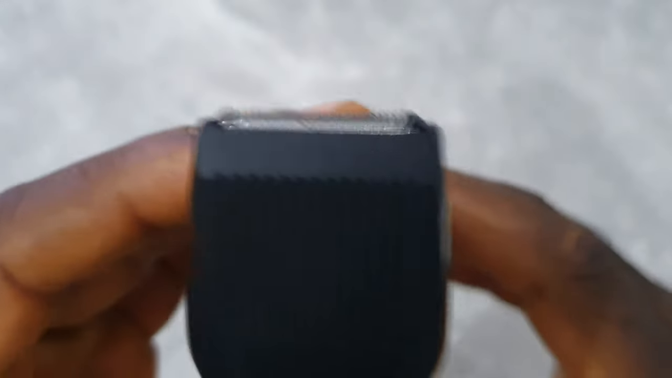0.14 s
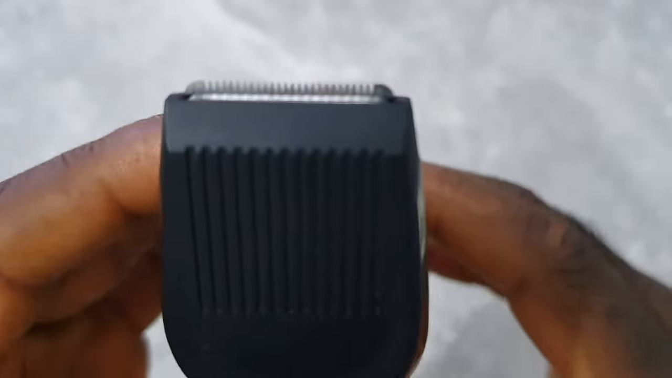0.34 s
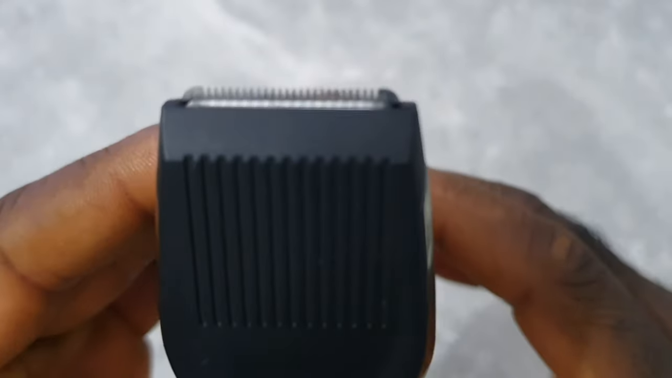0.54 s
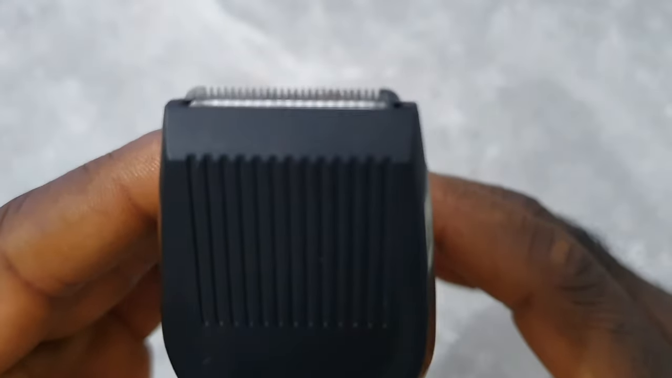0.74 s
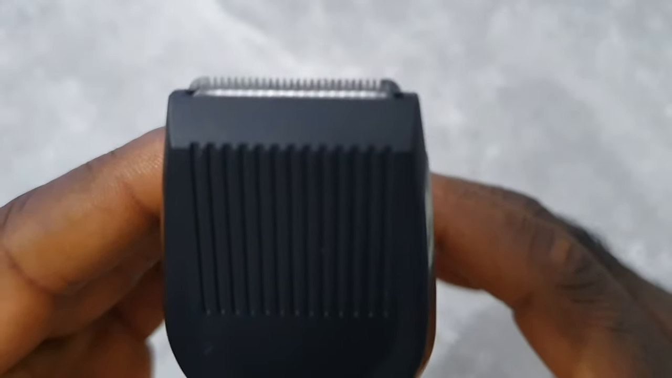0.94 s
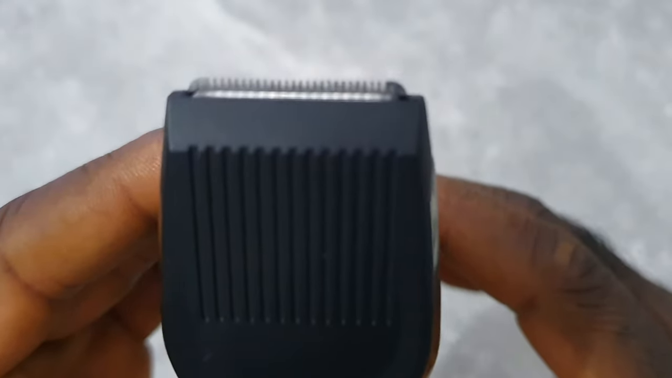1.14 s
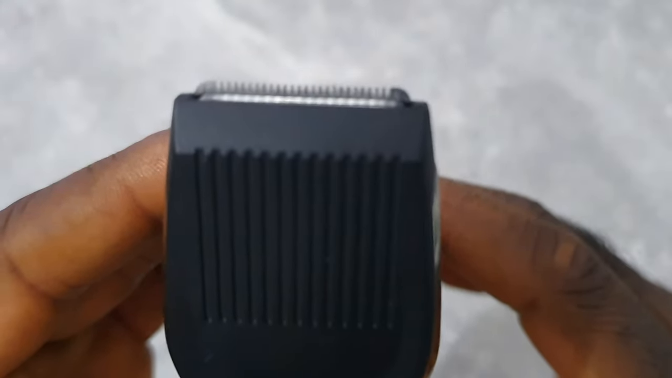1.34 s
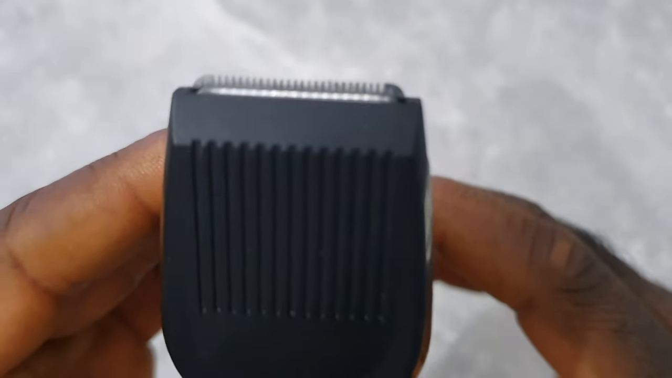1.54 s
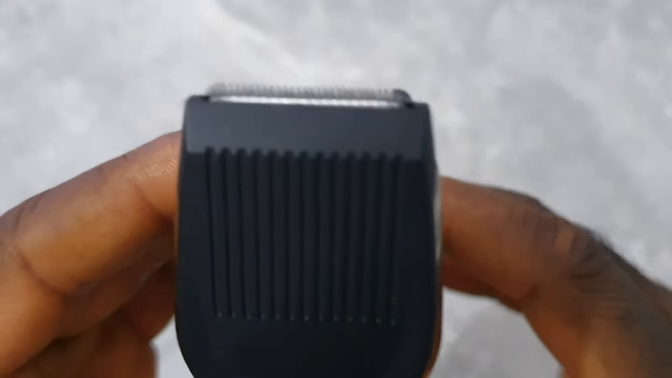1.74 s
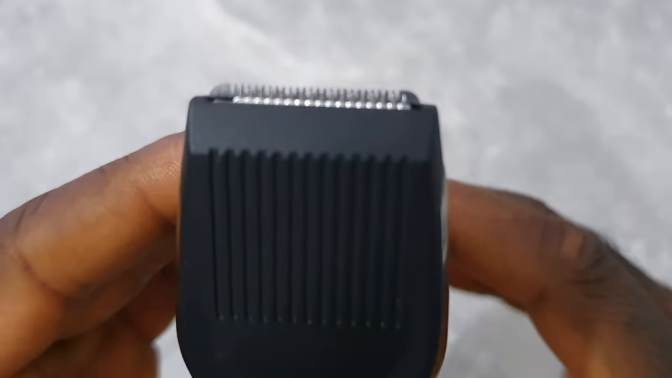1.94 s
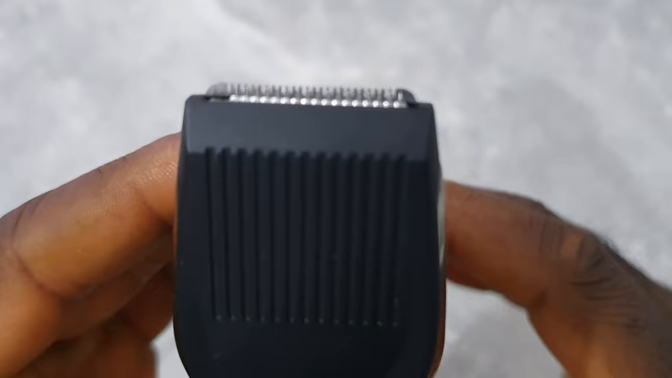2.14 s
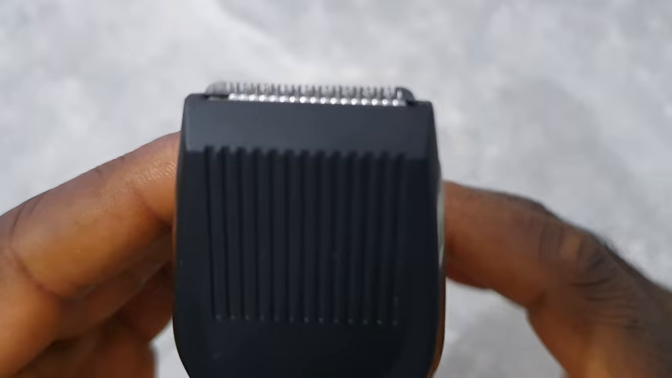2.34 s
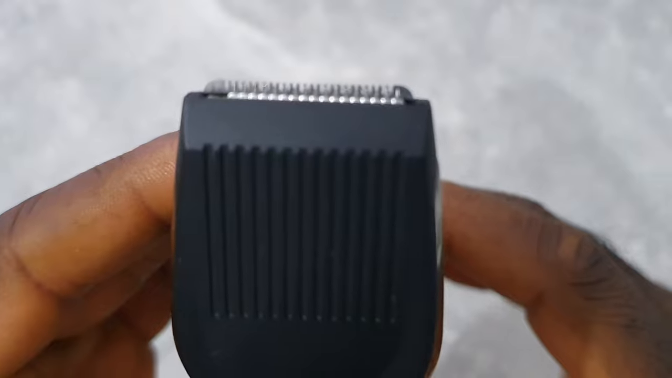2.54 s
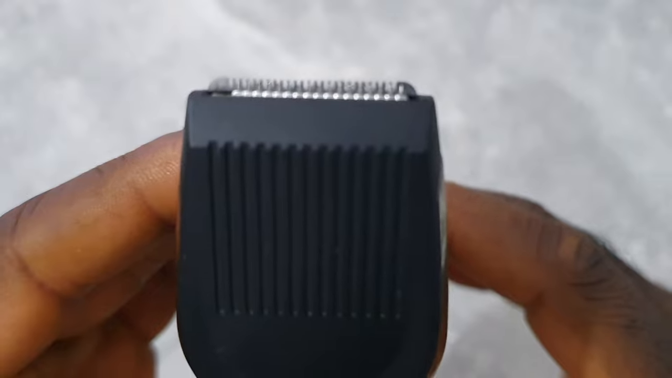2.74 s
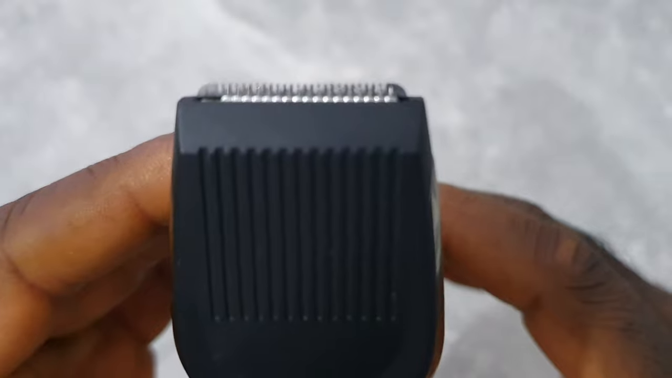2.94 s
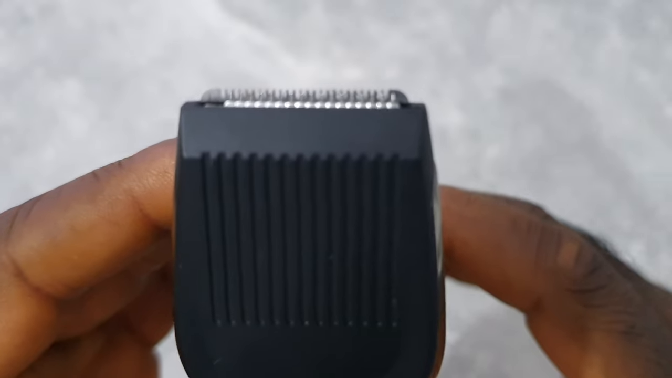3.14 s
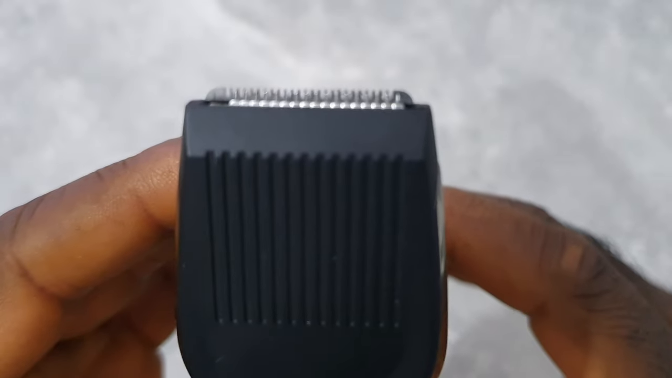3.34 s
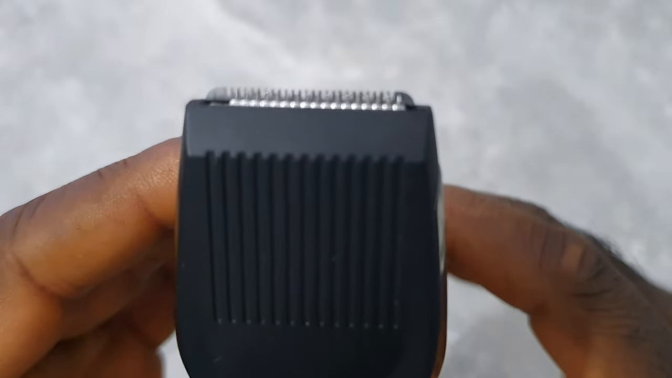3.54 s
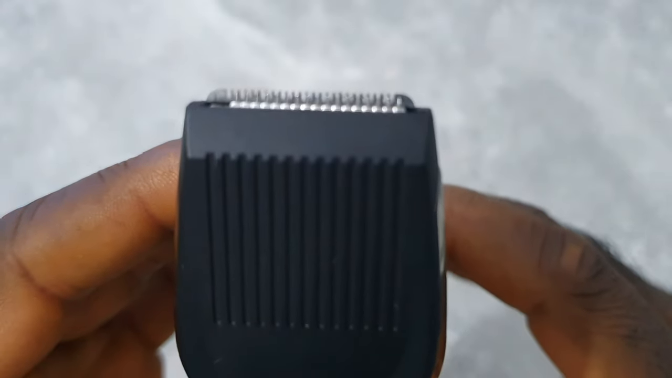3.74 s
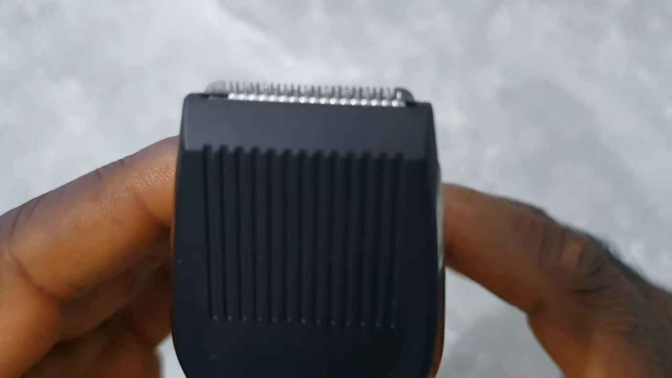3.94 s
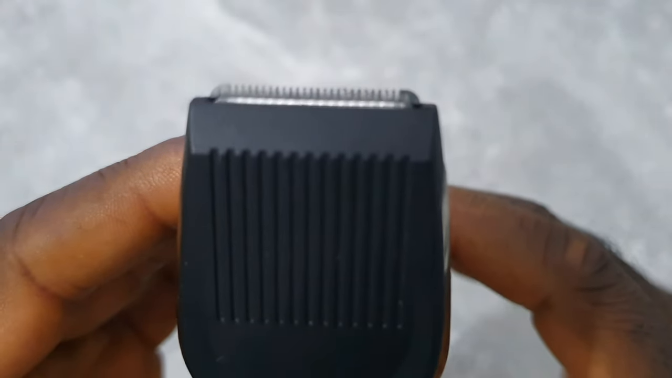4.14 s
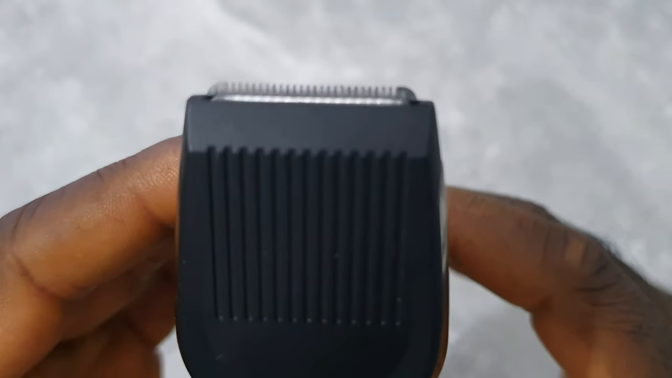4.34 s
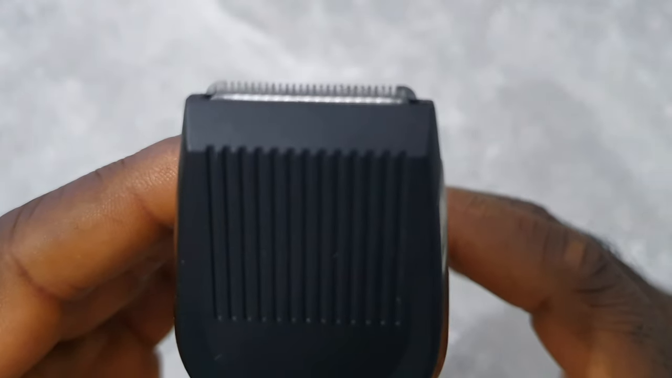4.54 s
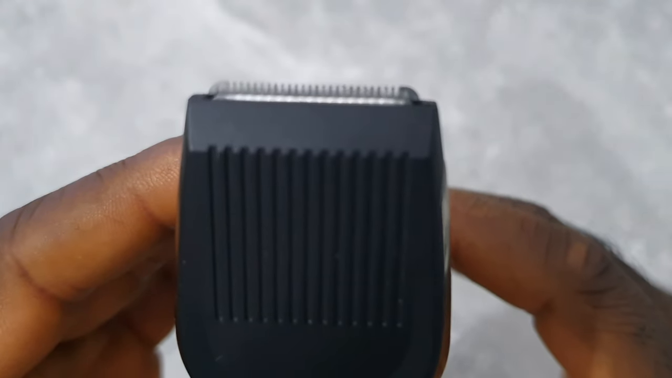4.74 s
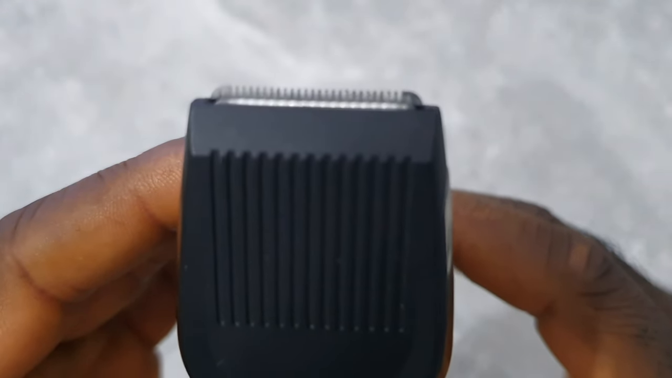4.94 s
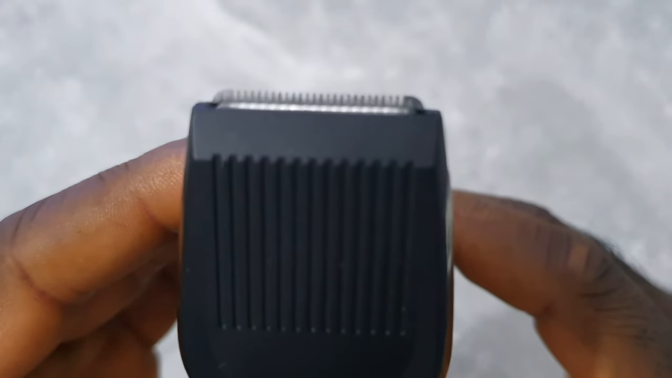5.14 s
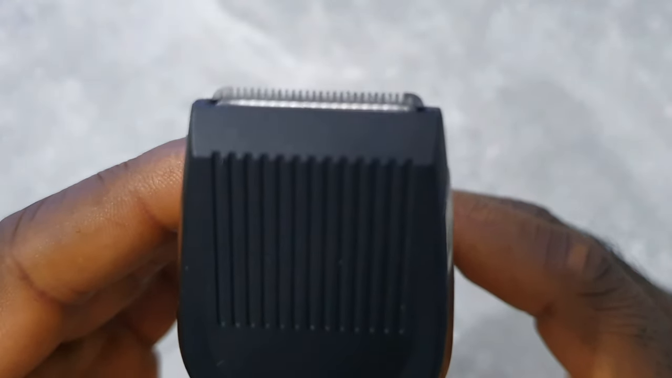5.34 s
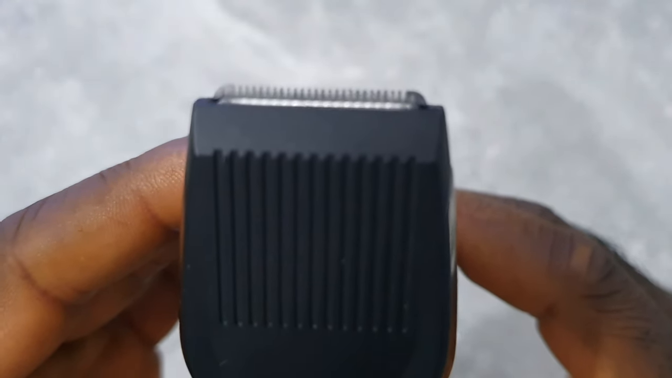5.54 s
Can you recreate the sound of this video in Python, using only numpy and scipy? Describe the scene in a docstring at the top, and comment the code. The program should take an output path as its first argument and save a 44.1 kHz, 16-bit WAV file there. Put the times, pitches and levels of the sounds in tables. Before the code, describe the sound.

A small battery hair trimmer buzzes close up, clicks off and winds down quickly, then after a quiet pause clicks back on and buzzes.

```python
"""A battery hair trimmer buzzes close to a phone's two microphones in a small quiet room. Its motor drives
the blade through an 11:28 gear: both give tones, while the blade chatters and rasps in the plastic housing.
The button clicks, the drive coasts to rest, and after a pause it clicks again and the buzz restarts.
Behind it lie the wavering hum lines of a cooling appliance and soft room air. Tones are sums of sines,
chatter is a train of timed knocks, rasp and air are shaped noise, and clicks ring decaying shell modes."""
import sys
import numpy as np
from scipy import signal
from scipy.fft import rfft, irfft
from scipy.io import wavfile

SR = 44100
rng = np.random.default_rng(int(sys.argv[2]) if len(sys.argv) > 2 else 0)


def bounce(signal):
    """Save signal as a 16-bit WAV file at the path given by the first command-line argument."""
    frames = np.transpose(np.atleast_2d(signal))
    limited = np.clip(frames, -1, 1)
    pcm = np.round(limited * 32767).astype(np.int16)
    wavfile.write(sys.argv[1], SR, pcm)


N = 246519
T = np.arange(N) / SR
FREQS = np.fft.rfftfreq(N, 1 / SR)


def amp(db):
    """Decibels to gain."""
    return 10 ** (np.asarray(db) / 20)


def unit(x):
    """Scale to rms 1."""
    return x / np.sqrt(np.mean(x ** 2))


def over_frequency(table, axis=1):
    """One column of a table, joined on a log-frequency axis."""
    columns = np.transpose(table)
    return np.interp(np.log(FREQS + 1), np.log(columns[0]), columns[axis])


def colour(x, db):
    """Give a white signal of rms 1 a spectrum in dB per Hz."""
    return irfft(rfft(x) * amp(db) * np.sqrt(SR / 2), N)


def microphones(pair, likeness):
    """Mix two unrelated signals into left and right with a given correlation at each frequency."""
    c = np.clip(over_frequency(likeness), -1, 1)
    mid, side = rfft(pair) * np.sqrt(np.array([1 + c, 1 - c]) / 2)
    return irfft(np.array([mid + side, mid - side]), N)


def walk(rate):
    """Random wavering of rms 1: straight lines between chance values, rate of them per second."""
    knots = rng.standard_normal(N // 100)
    return unit(np.interp(T * rate, np.arange(len(knots)), knots))


# what the housing radiates from white noise of rms 1:
# (frequency [Hz], left level [dB per Hz], right level [dB per Hz])
HOUSING_RADIATION = [(192, -104, -104), (430, -91, -98), (880, -81, -91), (1170, -80.5, -105),
                     (1550, -76, -74.5), (2900, -80, -84.5), (2990, -74.5, -75), (3900, -68.5, -75.5),
                     (4470, -75.5, -77.5), (5100, -74, -80.5), (6470, -81, -83.5), (7280, -74, -86.5),
                     (8370, -87.5, -88), (15400, -83.5, -92)]
# how alike the two close microphones hear the blade: (frequency [Hz], correlation [-1 to 1])
BLADE_LIKENESS = [(200, 0.82), (600, -0.48), (1400, 0.53), (3000, -0.059), (6000, -0.071)]
# blade strokes per second once warm; how much slower at first [Hz]; time constant of warming up [s]
STROKE_HZ, COLD_SAG_HZ, WARM_S = 61.79, .34, 1.35


def trimmer(chatter_db=0, rasp_db=-2.0, speed_power=1.57, judder=0.0607, lash_db=2, lash_hz=1750):
    """One speed drives tones, chatter and rasp; below full speed the gear judders and the tones fade."""
    flutter = .0007  # rms share of speed, always present
    pace, effort = drive()
    full_hz = STROKE_HZ - COLD_SAG_HZ * np.exp(-T / WARM_S)
    unsteady = np.abs(1 + flutter * walk(45) + judder * (1 - pace) * walk(200))
    stroke = np.cumsum(pace * full_hz * unsteady) / SR  # strokes so far
    motor = stroke * 28 / 11  # motor turns so far
    whine = tones(stroke, motor) + overtones(stroke)

    # while the speed changes, the strained gear sweeps its tones through a resonance of the housing
    resonance = signal.butter(2, [.8 * lash_hz, 1.2 * lash_hz], "band", fs=SR, output="sos")
    strain = np.minimum(6 * (1 - pace), 1) * pace
    lash = amp(lash_db) * strain * signal.sosfilt(resonance, whine)

    blade = amp(chatter_db) * chatter(stroke, motor) + amp(rasp_db) * rasp(stroke)
    housing_db = np.array([over_frequency(HOUSING_RADIATION, axis=side) for side in (1, 2)])
    blade_noise = colour(microphones(blade, BLADE_LIKENESS), housing_db)
    return effort * (pace ** speed_power * whine + lash + blade_noise)


# the power is cut, then comes back [s]
OFF_S, ON_S = 1.787, 4.104
# time to brake to rest; time constant of closing in on full speed [s]
COAST_S, SPIN_UP_S = .178, .021
# power of speed in the effort; starting jolt [share of full effort] and its decay time constant [s]
EFFORT_POWER, JOLT, JOLT_S = 1.0, 1, .019


def drive():
    """Share of full speed, and effort: friction brakes evenly to rest; starting torque adds a dying jolt."""
    since_on = np.maximum(T - ON_S, 0)
    coasting = np.clip(1 - (T - OFF_S) / COAST_S, 0, 1)
    spinning_up = 1 - np.exp(-since_on / SPIN_UP_S)
    pace = np.clip(coasting + spinning_up, 0, 1)
    jolt = JOLT * (T > ON_S) * np.exp(-since_on / JOLT_S)
    return pace, pace ** EFFORT_POWER + jolt


# leading tones of motor and gear at full speed, at sums of stroke and motor multiples:
# (stroke multiple, motor multiple, level before the stop [dB], level after it [dB],
#  left minus right [dB], lag of the right microphone [rad])
LEADING_TONES = [(0, 6, -54, -53, 0, -3.1), (0, 9, -48, -52, -2, -1.5), (0, 10, -55, -56, 2, 0),
                 (0, 12, -51, -48, -9, -2.5), (0, 15, -52, -48, -9, -2.3), (55, 1, -52, -51, 3, .9),
                 (57, 1, -46, -47, 10, 2.2), (10, 0, -64, -65, -1, 1.1), (15, 0, -57, -57, -4, .1),
                 (19, 0, -50, -54, 6, -2.8), (21, 0, -56, -59, 4, -.7), (28, 0, -44, -42, 0, -2.2),
                 (29, 0, -56, -51, 10, -1), (30, 0, -52, -53, 6, 2.8), (64, 0, -51, -50, 13, 1),
                 (68, 0, -54, -54, 4, -.5), (72, 0, -53, -53, 6, .3), (82, 0, -53, -51, 12, -.7),
                 (84, 0, -53, -51, 10, -.5)]


def tones(stroke, motor, waver_db=1, tones_db=0):
    """Clean lines of gear, blade and motor, reaching each microphone at its own level and phase."""
    out = np.zeros((2, N))
    for strokes, turns, before_db, after_db, pan_db, lag in LEADING_TONES:
        cycles = strokes * stroke + turns * motor + rng.random()
        # the blade seats itself a little differently after the stop
        size = amp(np.where(T < ON_S, before_db, after_db) + waver_db * walk(11.0))
        sides = unit(amp(np.array([[pan_db], [-pan_db]]) / 2))
        angle = (2 * np.pi * (cycles % 1) - np.array([[0], [lag]])).astype(np.float32)
        out += np.sqrt(2) * size * sides * np.sin(angle)
    return amp(tones_db) * out


# outline of the other stroke harmonics, before the trim overtones_db:
# (frequency [Hz], level of each harmonic [dB])
OVERTONE_OUTLINE = [(370, -71), (494, -71), (555, -58), (679, -64), (740, -51), (802, -50), (1000, -61),
                    (1400, -60), (1660, -54), (2130, -65), (3750, -55), (4150, -62), (5800, -60),
                    (6300, -67), (7000, -62), (7700, -69)]
# how they reach the microphones: (frequency [Hz], left minus right [dB], lag of the right one [rad])
OVERTONE_SIDES = [(450, 8, 3.2), (600, -4, 3.3), (820, -6, 3.1), (1070, 9, 2.3), (1700, 0, 3.5),
                  (2600, 5, 3.9), (3700, 12, 6.5), (4200, 5, 7), (5500, 10, 4.5)]


def overtones(stroke, count=118, uneven_db=4, overtones_db=-0.07):
    """Buzz between the leading tones: stroke harmonics shaped by the housing, the higher more uneven."""
    leading = [strokes for strokes, turns, *_ in LEADING_TONES if turns == 0]
    comb = np.zeros(N, np.float32)
    turn = (2 * np.pi * (stroke % 1)).astype(np.float32)
    for k in range(6, count):
        if k in leading:
            continue
        # the unevenness is drawn anew for the restart
        before, after = amp(uneven_db * k / count * rng.standard_normal(2)).astype(np.float32)
        comb += np.where(T < ON_S, before, after) * np.sin(k * turn + 2 * np.pi * rng.random())
    pan = amp(over_frequency(OVERTONE_SIDES, axis=1))
    lag = over_frequency(OVERTONE_SIDES, axis=2)
    sides = np.array([pan, np.exp(-1j * lag)]) * 2 / np.hypot(pan, 1)
    outline = amp(over_frequency(OVERTONE_OUTLINE) + overtones_db)
    return irfft(rfft(comb) * outline * sides, N)


def chatter(stroke, motor, count=26, scatter_db=3.5, wobble=0.68, spread_s=.004):
    """The blade knocks at the same places in every stroke, harder or softer with the angle of the motor."""
    slop_s = .000006  # random timing error of a knock
    place, lean, weight = rng.random((count, 3)).T
    strokes = np.arange(int(stroke[-1]) + 1)[:, None]
    at = np.interp(strokes + (np.arange(count) + place) / count, stroke, T)  # knock times [s]
    motor_angle = 2 * np.pi * (np.interp(at, T, motor) + lean)
    size = (1 + weight) * (1 + wobble * np.cos(motor_angle))
    size = size * amp(scatter_db * rng.standard_normal(at.shape))

    # short sinc pulses place each knock between samples
    sample = (at + slop_s * rng.standard_normal(at.shape)).reshape(-1, 1) * SR
    taps = sample.astype(int) + np.arange(-6, 7)
    inside = (taps >= 0) & (taps < N) & (at.reshape(-1, 1) < T[-1])
    pulses = size.reshape(-1, 1) * np.sinc(taps - sample)
    knocks = np.bincount(taps[inside], pulses[inside], N)
    knocks = knocks / knocks[:SR].std()

    # such small contacts stir mainly the treble
    treble = signal.butter(3, 2400, "high", fs=SR, output="sos")
    return disperse(signal.sosfilt(treble, knocks), spread_s)


def disperse(x, spread_s, ripple_hz=220):
    """The housing passes every frequency to each microphone with a delay of its own."""
    knots = rng.random((2, 1000))
    delay = spread_s * np.array([np.interp(FREQS / ripple_hz, np.arange(len(k)), k) for k in knots])
    cycles = np.cumsum(delay, axis=1) * SR / N  # phase is delay summed over frequency
    return irfft(rfft(x) * np.exp(-2j * np.pi * cycles), N)


def rasp(stroke, swing_db=-1.0, grain_db=2.0):
    """Steel teeth slide over the comb: noise with a random grain, swelling once in each stroke."""
    level_db = swing_db * np.cos(2 * np.pi * stroke) + grain_db * walk(400)
    return unit(rng.standard_normal((2, N)) * amp(level_db))


# button clicks and the kick of the starting gear, peak level before bass cut and panning:
# (time [s], level [dB], contact time [s], treble tilt [dB per octave])
CLICK_TIMES = [(1.5612, -13, 0.00034, -0.5), (1.7811, -10.5, .0004, -1.5), (1.7825, -20, 0.00017, 10),
               (3.8323, -24, 0.00028, 15), (3.8334, -15.5, 0.0006, 1.5), (4.0908, -20.5, .0003, 0.5),
               (4.093, -13, 0.0011, -1), (4.106, -10.5, 0.0013, 4)]
# modes of the struck shell, before the tilt: (frequency [Hz], level [dB], decay time to -60 dB [s])
SHELL_MODES = [(666, -3, 0.0063), (840, 0, 0.0093), (1466, 1.5, 0.011), (2130, 1, 0.0056),
               (3034, -2.5, 0.015), (3800, -5.5, 0.0061), (4950, -7, 0.0099), (5800, -10, 0.0074),
               (6880, -9.5, 0.0071), (10100, -25.5, 0.0072), (11200, -26.5, 0.0048), (15550, -23.5, .007)]


def button(clicks_db=0, pan_db=3, pivot_hz=3000, lowest_hz=450, lag_s=0.000279):
    """A sharp push and a short scrape ring the plastic shell, which is too small to radiate bass."""
    scrape = .07  # noise beside a push of 1
    out, t = np.zeros(N), T[:SR // 20]
    hz, mode_db, t60 = np.transpose(SHELL_MODES)[:, :, None]
    signs = (-1) ** np.arange(len(hz))[:, None]
    modes = signs * np.exp(-np.log(1000) * t / t60) * np.sin(2 * np.pi * hz * t)
    for s, db, contact_s, tilt_db in CLICK_TIMES:
        push = scrape * rng.standard_normal(len(t)) * np.exp(-t / contact_s)
        push[0] += 1
        shell = (amp(mode_db + tilt_db * np.log2(hz / pivot_hz)) * modes).sum(0)
        snap = signal.fftconvolve(push, shell)[:len(t)]
        first = int(s * SR)
        out[first:first + len(t)] += amp(db) * snap / np.abs(snap).max()
    out = signal.sosfilt(signal.butter(3, lowest_hz, "high", fs=SR, output="sos"), out)
    # the right microphone is further from the button
    later = irfft(rfft(out) * np.exp(-2j * np.pi * FREQS * lag_s), N)
    return np.array([out, later]) * amp(clicks_db + np.array([[pan_db], [-pan_db]]) / 2)


def ring(x, t60):
    """Dense decaying reflections, different for each microphone; the power is kept."""
    tail = rng.standard_normal((2, SR // 2)) * np.exp(-np.log(1000) * T[:SR // 2] / t60)
    tail /= np.linalg.norm(tail, axis=1, keepdims=True)
    return signal.fftconvolve(np.atleast_2d(x), tail, axes=1)[:, :N]


# the appliance's fan and compressor lines, mean level:
# (frequency [Hz], level [dB], lead of the right microphone [rad])
APPLIANCE_LINES = [(20.9, -64.5, .2), (44.7, -70.5, .2), (63.6, -74.5, .2), (87, -64, 0.63),
                   (99.6, -64, 0.43), (541.4, -74, 1.83), (795, -79, 1.9), (870, -83, 2.3),
                   (1237, -63.5, 2.51), (1343, -72.5, 2.5), (1414, -68.5, 1.94), (1468, -68.5, 2.38),
                   (1454, -82.5, 2.1)]
# soft air of the room: (frequency [Hz], level [dB per Hz])
ROOM_AIR = [(30, -92), (110, -96.5), (200, -101), (480, -101), (800, -97.5), (1030, -104), (1330, -94),
            (1800, -111), (2450, -113), (2900, -105), (3700, -111), (7400, -112), (8400, -133),
            (15500, -132)]
# how alike the two microphones hear that air: (frequency [Hz], correlation [-1 to 1])
ROOM_AIR_LIKENESS = [(130, 0.59), (290, -0.043), (640, -0.41), (1400, -0.58), (3100, 0.34), (6000, 0.36)]


def background(waver_db=1.0, air_db=0):
    """Appliance lines of fixed pitch, each wavering in level, over shaped noise for the room air."""
    air = microphones(rng.standard_normal((2, N)), ROOM_AIR_LIKENESS)
    out = colour(air, over_frequency(ROOM_AIR) + air_db) * amp(.5 * walk(4.52))
    for hz, db, lead in APPLIANCE_LINES:
        angle = 2 * np.pi * (hz * T + rng.random()) + np.array([[0], [lead]])
        out = out + np.sqrt(2) * amp(db + waver_db * walk(2.96)) * np.sin(angle)
    return out


def scene(click_room_db=-13, buzz_room_db=-19, room_t60=0.35):
    """The trimmer and its button, close by, with a little room and the background."""
    buzz, clicks = trimmer(), button()
    room = ring(amp(buzz_room_db) * buzz + amp(click_room_db) * clicks, room_t60)
    return buzz + clicks + room + background()


TOP_HZ = 15800


def record(dry):
    """The phone cuts the top: a steep low-pass at TOP_HZ."""
    return signal.sosfilt(signal.ellip(10, .2, 70, TOP_HZ, fs=SR, output="sos"), dry)


dry = scene()
out = record(dry)
bounce(out)
```